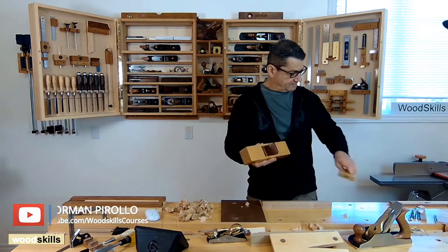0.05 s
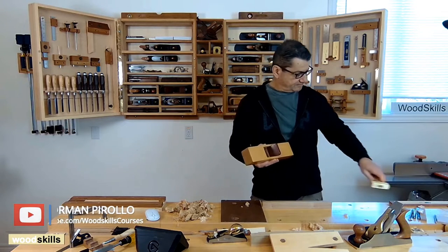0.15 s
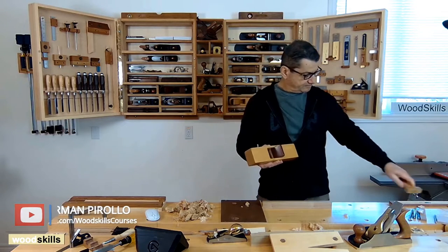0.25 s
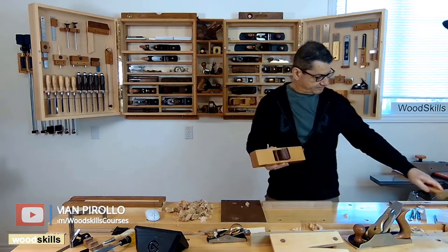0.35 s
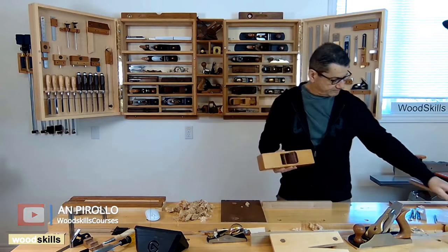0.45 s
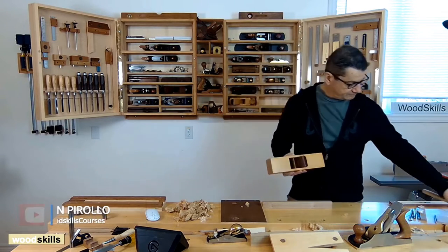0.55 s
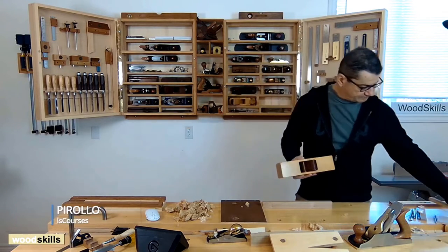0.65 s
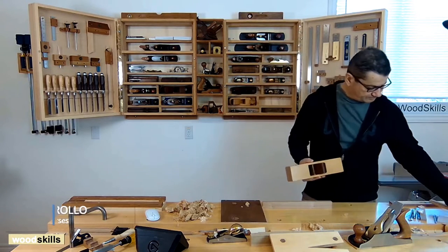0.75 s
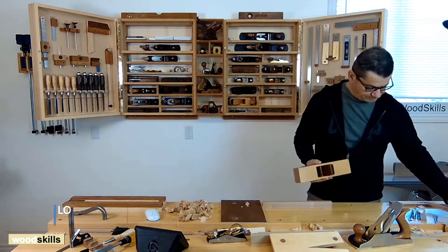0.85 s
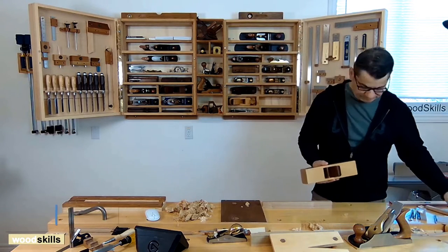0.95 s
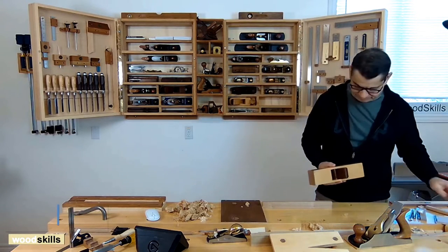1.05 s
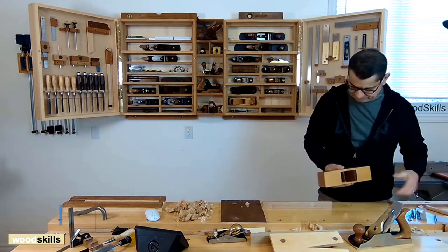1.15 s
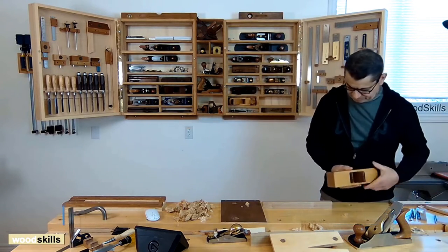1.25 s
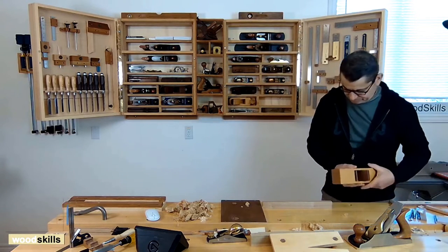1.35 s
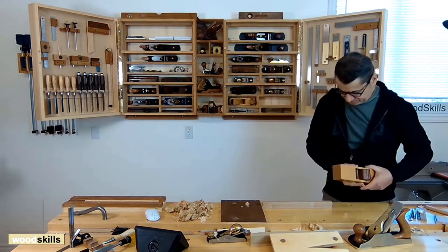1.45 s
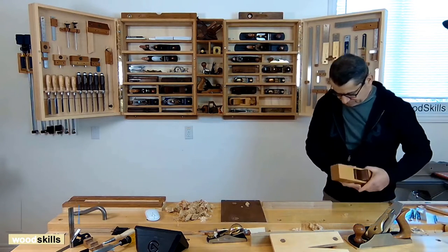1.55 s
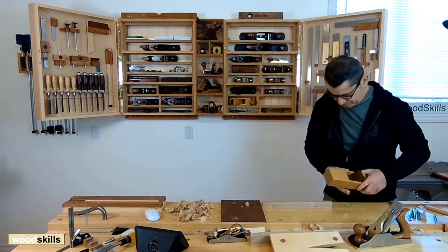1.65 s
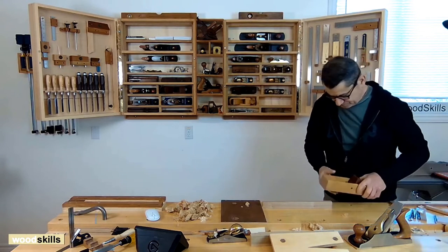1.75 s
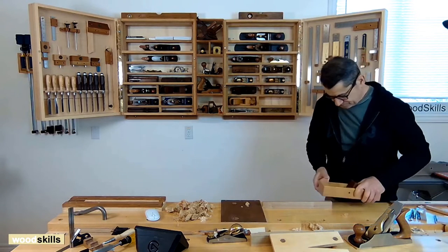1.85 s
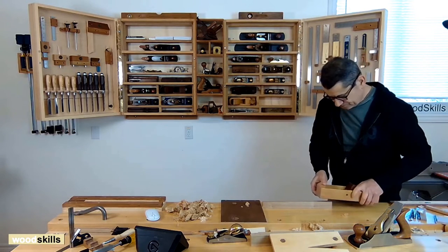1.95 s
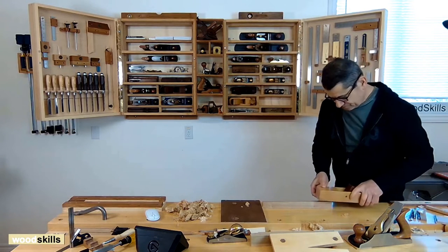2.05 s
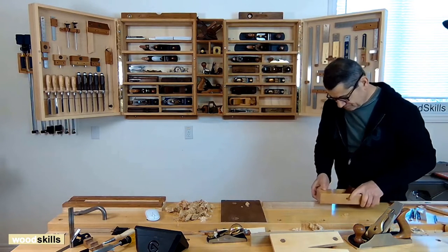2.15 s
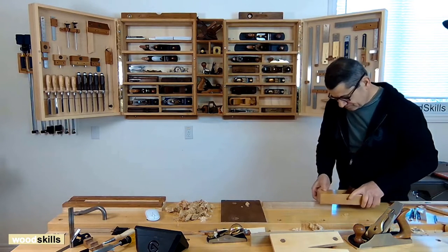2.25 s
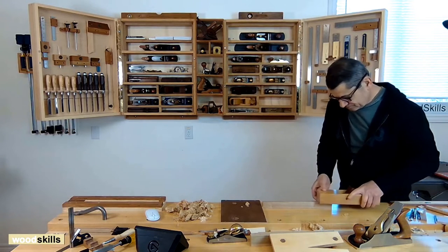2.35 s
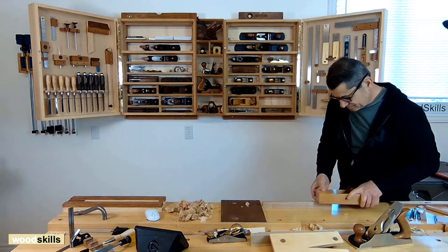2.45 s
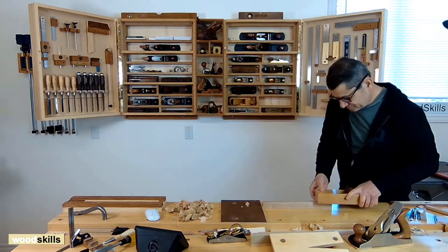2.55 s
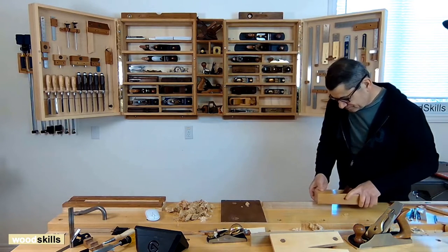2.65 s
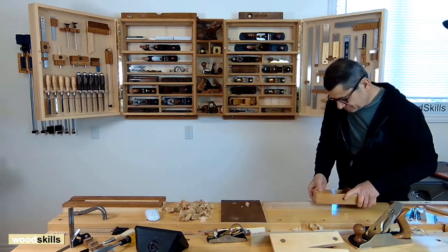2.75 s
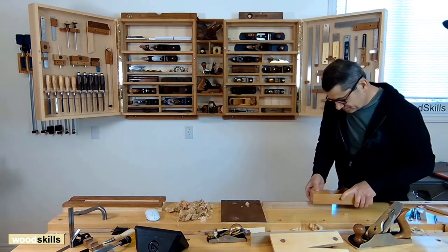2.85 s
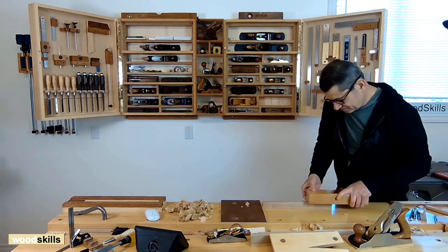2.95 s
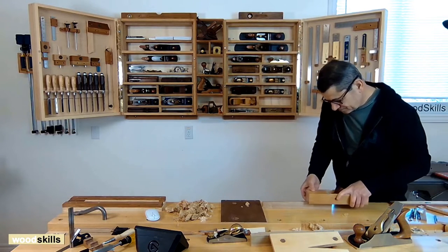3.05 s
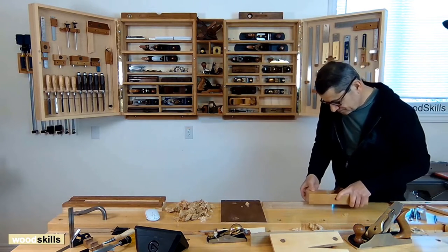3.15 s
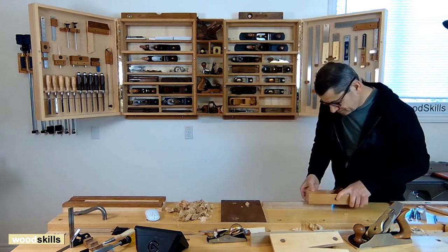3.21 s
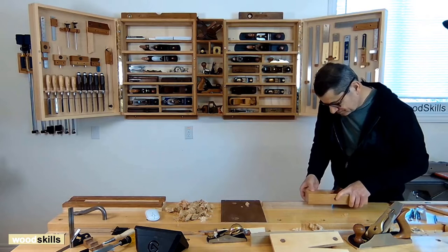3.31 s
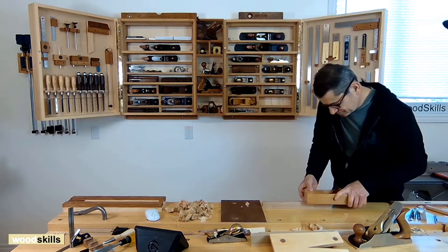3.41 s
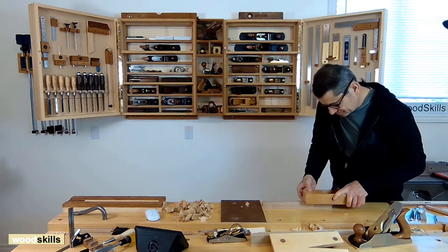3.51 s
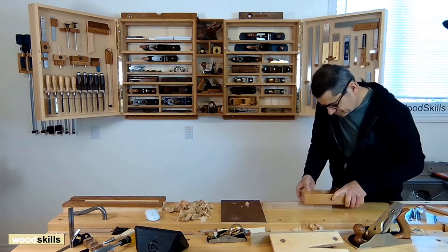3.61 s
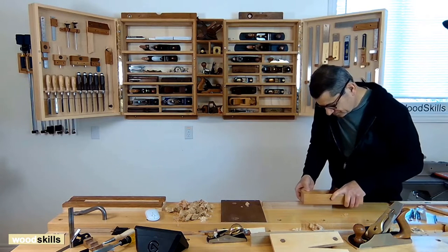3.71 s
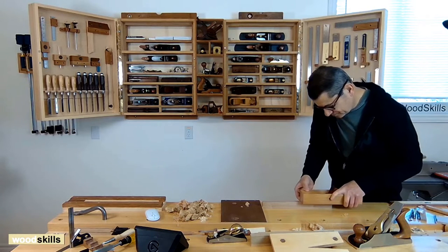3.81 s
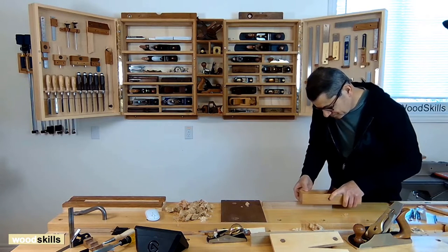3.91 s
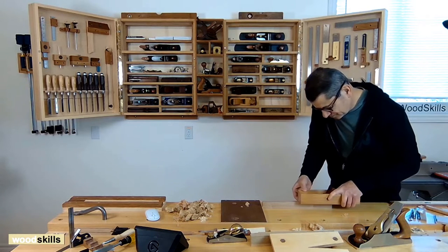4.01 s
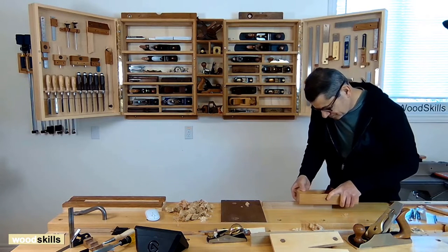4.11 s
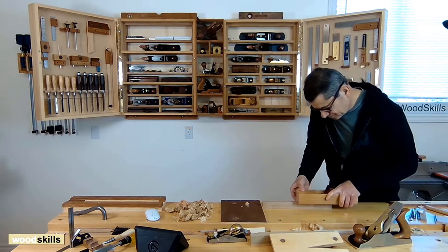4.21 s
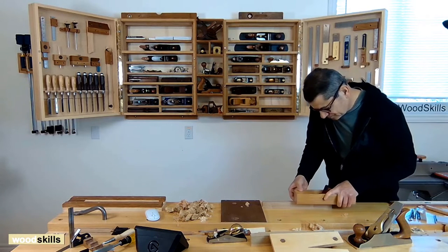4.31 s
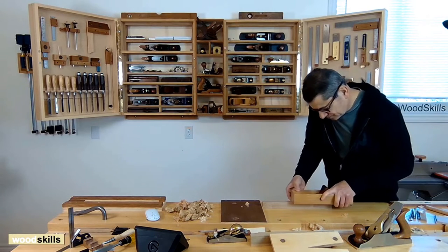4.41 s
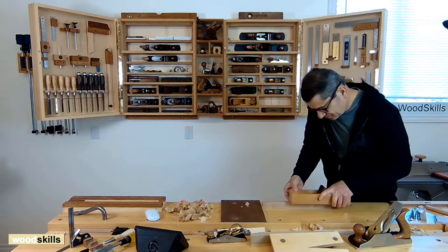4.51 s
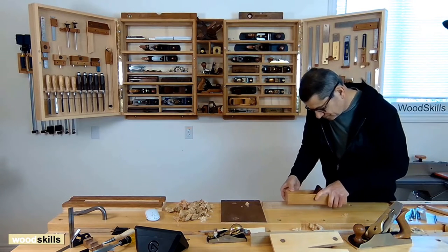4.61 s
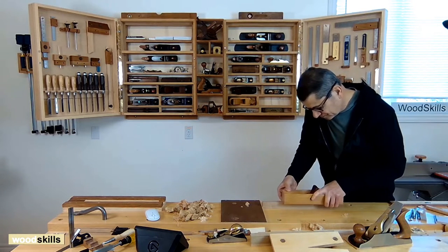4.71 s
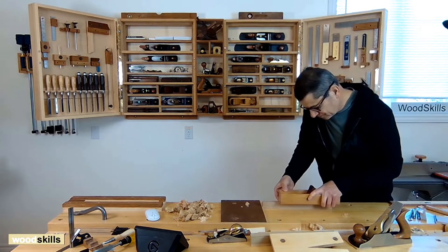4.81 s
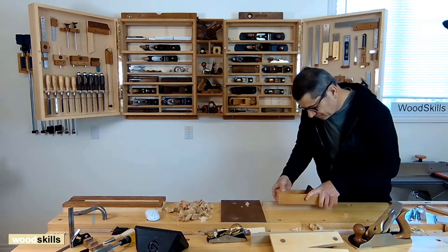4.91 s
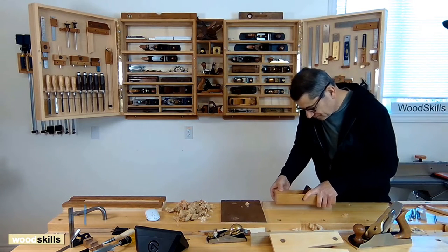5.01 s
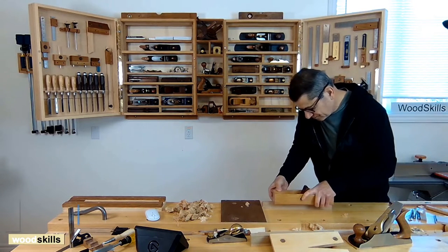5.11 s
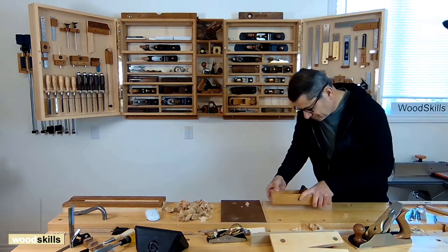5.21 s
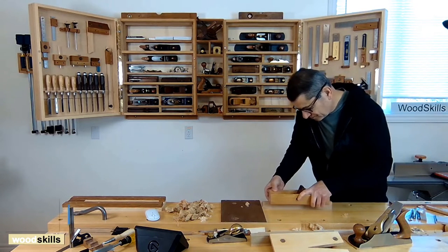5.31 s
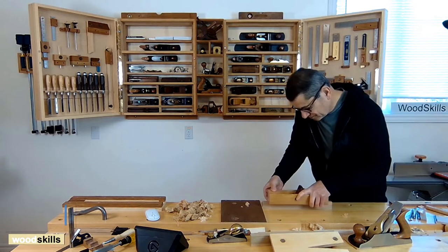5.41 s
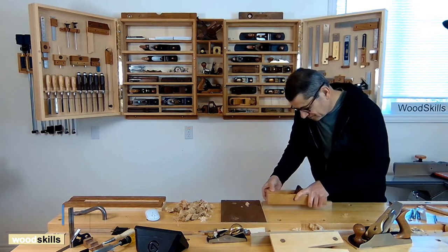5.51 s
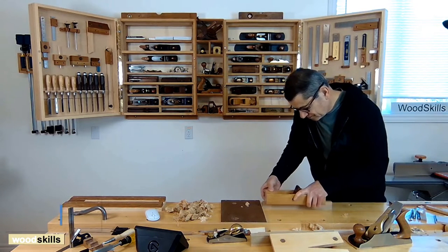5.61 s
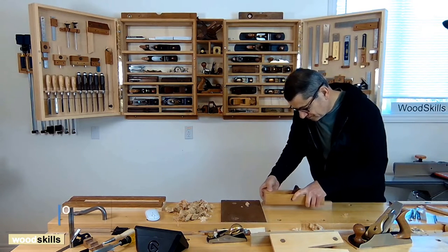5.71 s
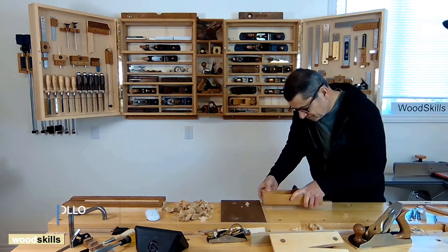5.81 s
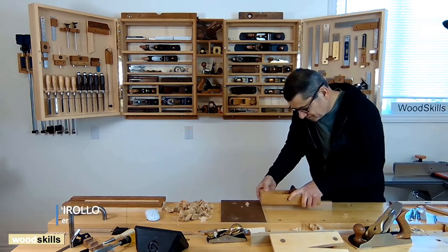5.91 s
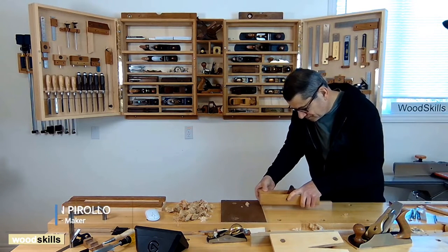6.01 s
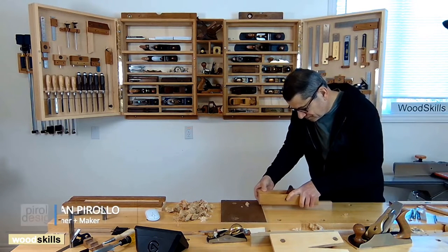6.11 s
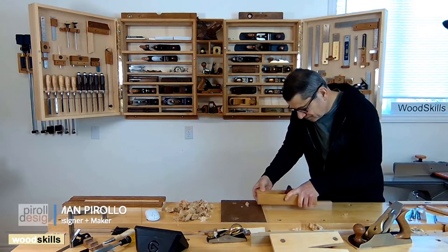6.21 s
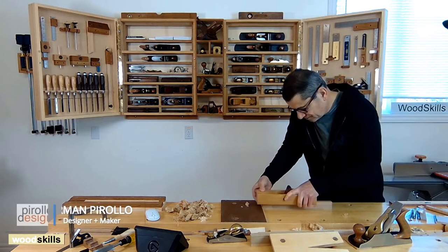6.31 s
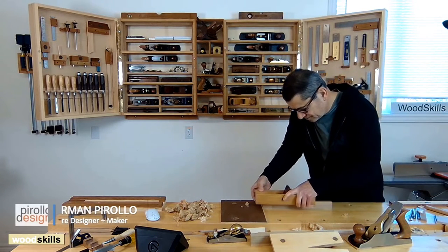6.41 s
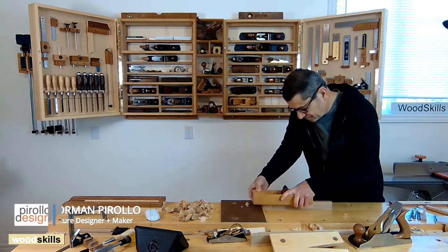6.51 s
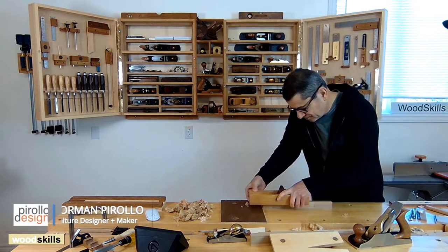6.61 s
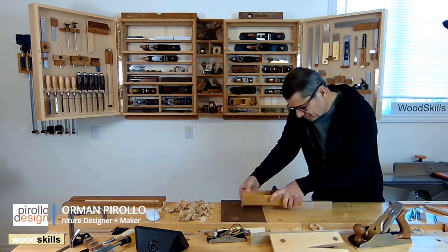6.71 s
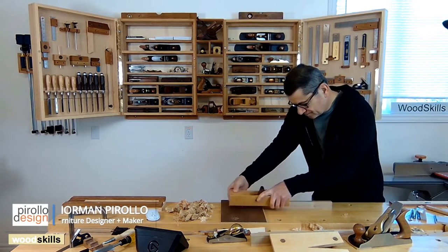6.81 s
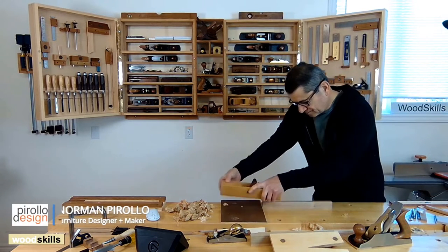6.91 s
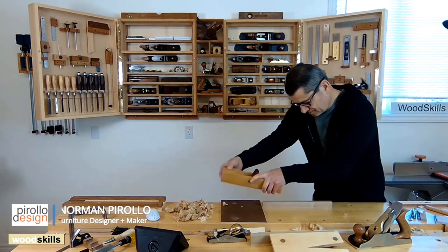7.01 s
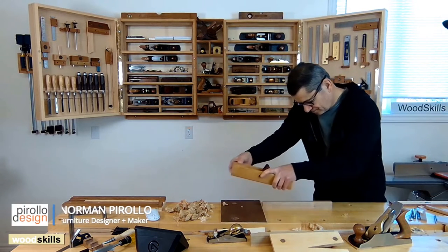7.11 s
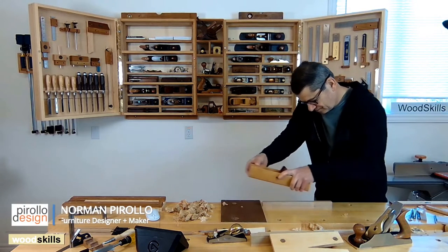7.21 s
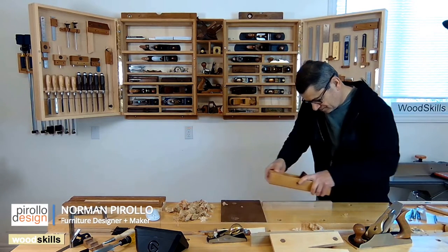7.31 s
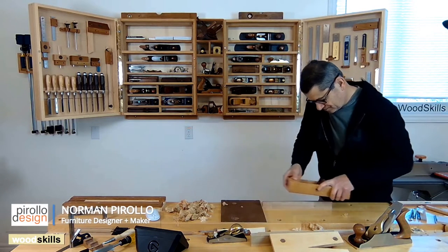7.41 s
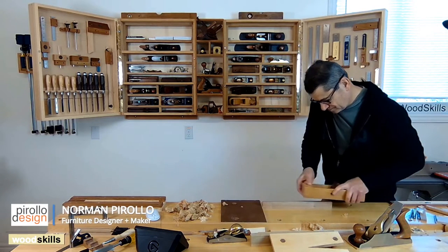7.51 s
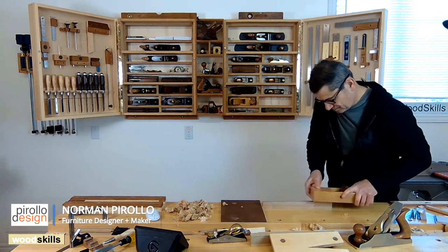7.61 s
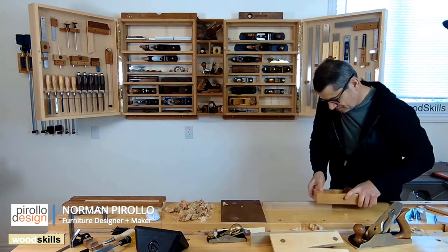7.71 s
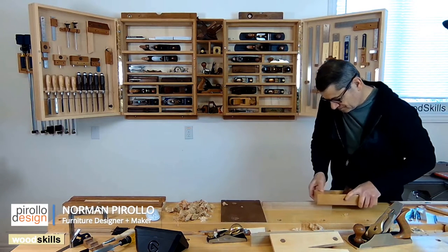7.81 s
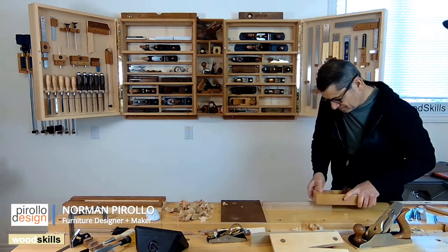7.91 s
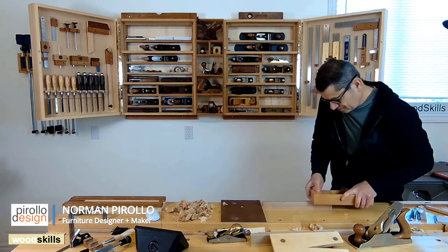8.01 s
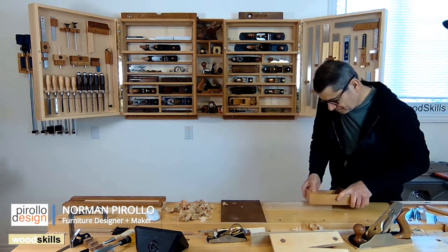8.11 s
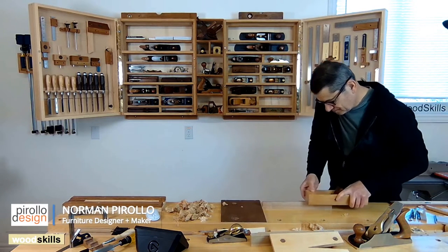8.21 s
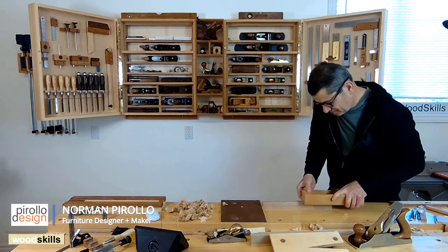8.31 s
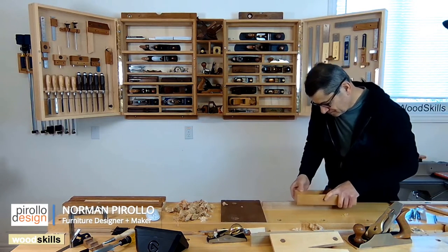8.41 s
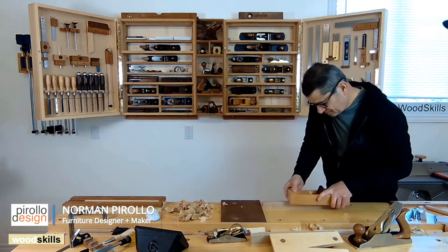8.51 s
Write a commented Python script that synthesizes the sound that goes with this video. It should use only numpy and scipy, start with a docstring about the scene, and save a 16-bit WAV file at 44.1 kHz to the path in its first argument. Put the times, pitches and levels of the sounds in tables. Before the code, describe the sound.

A few metres from the microphone in a live, quiet workshop, a faint metallic ping and two soft steps lead to dull wooden taps and a loud steel clank on a metal table. Clothing rustles, a wooden plane lands gently on a board, then one long uneven shaving stroke rumbles and hisses, ending in a stronger scrape. A sharp wooden knock follows, and another stroke begins.

```python
"""In a live workshop, heard a few metres off, a steel tool rings faintly and feet step on the floor.
Shoes shuffle and sleeves rustle (shaped noise); the tool goes down on a machine table, handle first, then
steel head (dying sines on dull thuds), and furniture sways. A wooden hand plane knocks on a board and takes
one long shaving (board texture read at the plane's speed, under a hiss of tearing fibres); then the plane
knocks down again and starts the next stroke. Still room air lies under it all."""
import sys
import numpy as np
from scipy import signal
from scipy.fft import rfft, irfft
from scipy.io import wavfile

SR = 44100
rng = np.random.default_rng(int(sys.argv[2]) if len(sys.argv) > 2 else 0)


def pcm_store(signal):
    """Save signal as 16-bit PCM."""
    levels = np.round(np.clip(np.atleast_2d(signal), -1, 1) * 32767)
    wavfile.write(sys.argv[1], SR, levels.astype(np.int16).T)


N = 377055
TIME = np.arange(N) / SR
GRID = 32768  # samples in every response
AGE = np.arange(GRID) / SR  # seconds since a response began
HZ = np.maximum(np.arange(GRID // 2 + 1) * SR / GRID, 1)

# Spectrum of the tool's wooden handle on the table. Each row: frequency in Hz, relative level in dB.
HANDLE_SPECTRUM = [(60, -13.5), (200, -8), (400, -11.5), (620, -3), (850, -2.5), (1200, -0.5),
                   (1450, -18.5), (2200, -22.5), (3200, -30.5), (12000, -58)]
# Spectrum of shoes on the floor. Each row: frequency in Hz, relative level in dB.
FOOT_SPECTRUM = [(50, -4), (130, 1.5), (220, -1.5), (320, -11.5), (700, -20), (1500, -28), (9000, -65.5)]


def from_db(db):
    """Turn dB into an amplitude factor."""
    return np.exp(np.asarray(db) * np.log(10) / 20)


def rms_one(x):
    """Scale a steady sound to an rms of 1."""
    return x / np.sqrt(np.mean(x ** 2) + 1e-20)


def unit_energy(x):
    """Scale a passing sound to an energy of 1."""
    return x / np.sqrt(np.sum(x ** 2) + 1e-20)


def at_hz(points, hz=HZ):
    """Read a spectrum between its points, along a logarithmic frequency axis."""
    points = np.array(points)
    return np.interp(np.log(hz), np.log(points[:, 0]), points[:, 1])


def lift(resonances):
    """The dB that resonances, each (Hz, width in Hz, peak dB), add at each frequency."""
    return sum(db / (1 + (2 * (HZ - hz) / width) ** 2) for hz, width, db in resonances)


def through(x, response):
    """Send a sound through a body or a room, keeping its length."""
    return signal.oaconvolve(x, response)[:len(x)]


def body(db):
    """Causal (minimum-phase) response of a body with this spectrum; energy 1."""
    cepstrum = irfft(np.log(from_db(db)))
    cepstrum[1:GRID // 2] *= 2
    cepstrum[GRID // 2 + 1:] = 0
    return unit_energy(irfft(np.exp(rfft(cepstrum))))


def noise(db):
    """Steady noise with this spectrum; rms 1."""
    white = rng.standard_normal(N + GRID - 1)
    return rms_one(signal.fftconvolve(white, body(db), "valid"))


def flutter(rate, depth_db):
    """A gain that wanders at random, heading for a new value this many times a second."""
    return from_db(depth_db * np.interp(TIME * rate, np.arange(N), rng.standard_normal(N)))


def ringing(modes):
    """Sum of dying sines, each (Hz, dB, t60 in s); each dB value is the energy of its mode."""
    total = 0
    for hz, db, t60 in modes:
        dying_sine = np.sin(2 * np.pi * hz * AGE) * from_db(-60 * AGE / t60)
        total = total + from_db(db) * unit_energy(dying_sine)
    return unit_energy(total)


def blow(sound, db):
    """A blow set to its level over a tenth of a second."""
    return from_db(db) * np.sqrt(SR / 10) * unit_energy(sound)


def soften(x, corner_hz):
    """A soft contact loses its treble."""
    r = np.exp(-2 * np.pi * corner_hz / SR)
    return signal.lfilter([1 - r], [1, -r], x + 1e-18)


def scatter(x, share=0.38):
    """Waves running to and fro in a solid spread a blow over a few milliseconds."""
    for lag in (7, 17, 29):  # samples; an allpass loop each
        loop = np.r_[1, np.zeros(lag - 1), share]
        x = signal.lfilter(loop[::-1], loop, x + 1e-18)
    return x


def add(out, s, sound):
    """Lay a sound into the take at s seconds."""
    start = max(round(s * SR), 0)
    out[start:start + len(sound)] += sound[:N - start]


def rub(moves, spectrum, rough_db, attack_s, release_s):
    """Something soft slides unevenly over a surface: each move swells, holds and dies away."""
    level = 0
    for s, length, db in moves:
        before = (s - TIME) / attack_s
        after = (TIME - s - length) / release_s
        level = level + from_db(db) * np.exp(-np.maximum(before, after).clip(0))
    return level * noise(at_hz(spectrum)) * flutter(50, depth_db=rough_db)


def workshop(x, wet_db, gap=0.0032):
    """Direct sound, then (after gap s) dense reflections, each band dying at its own pace.

    Every call draws a new pattern of reflections, as each place in the room has its own."""
    # Each row: frequency in Hz, t60 in s, strength of the reflections in dB on top of wet_db.
    room_bands = [(100, 0.17, 6), (304, 0.84, 2.5), (900, 0.78, 3.5), (2000, 0.78, 0.5), (4000, 0.66, -3),
                  (6960, 0.45, -4.5), (14000, 0.21, -5.5)]
    white, tail = rfft(rng.standard_normal(GRID)), 0
    for hz, t60, db in room_bands:
        band = at_hz([(row[0], row[0] == hz) for row in room_bands])
        tail = tail + irfft(white * band) * from_db(db - 60 * AGE / t60)
    middle_t60 = room_bands[2][1]
    middle_energy = np.sum(from_db(-60 * AGE / middle_t60) ** 2)
    response = tail * (AGE > gap) * from_db(wet_db) / np.sqrt(middle_energy)
    response[0] = 1  # the direct sound
    return through(x, response / np.hypot(1, from_db(wet_db)))


def nearby_echoes(x, share=.5, t60=0.13, size_hz=1500):
    """Tools and cabinets scatter the shorter waves back as quick echoes that comb a steady sound."""
    echoes = unit_energy(rng.standard_normal(GRID) * from_db(-60 * AGE / t60))
    short_waves = echoes - soften(echoes, size_hz)
    return (x + share * through(x, short_waves)) / np.hypot(1, share)


def still_air(level_db=-56):
    """The still room: steady noise, mostly deep."""
    # Each row: frequency in Hz, relative level in dB.
    air_spectrum = [(10, -15), (22, 4), (35, 0), (60, -7.5), (110, -25), (300, -20), (600, -24.5),
                    (1400, -26), (2200, -31), (4000, -38.5), (15000, -46)]
    return from_db(level_db) * noise(at_hz(air_spectrum))


def ping(s=0.0045, db=-50):
    """A light nudge leaves the steel tool ringing faintly on the table."""
    # Each row: frequency in Hz, relative energy in dB, t60 in s.
    ping_modes = [(1200, -0.5, 0.23), (1356, -5, 0.13), (1650, -7.5, 0.13)]
    out = np.zeros(N)
    nudge = ringing(ping_modes) + .5 * body(at_hz(HANDLE_SPECTRUM))
    add(out, s, workshop(blow(nudge, db), wet_db=12))
    return out


def steps(wet_db=6.5, shoe_hz=450):
    """Soft shoes come down on the floor, their treble lost in the sole."""
    # Each row: start in seconds, level in dB.
    footfalls = [(.282, -50.5), (.578, -43)]
    out, thump = np.zeros(N), soften(body(at_hz(FOOT_SPECTRUM)), shoe_hz)
    for s, db in footfalls:
        add(out, s, workshop(blow(thump, db), wet_db))
    return out


def shuffling():
    """Soles and palms rub over a surface: uneven noise with the spectrum of the feet."""
    # Each row: start in seconds, length in seconds, level in dB.
    shuffle_moves = [(.37, .06, -59), (1.48, 0.19, -53), (2.95, 0.36, -62), (3.62, 0.079, -53),
                     (4.05, 0.24, -51), (6.47, 0.043, -52), (7.58, .09, -61.5)]
    return rub(shuffle_moves, FOOT_SPECTRUM, rough_db=3.5, attack_s=0.076, release_s=.09)


def sleeves(gain_db=8.0):
    """Cloth brushes on cloth as the arms move."""
    # Each row: start in seconds, length in seconds, level in dB ahead of gain_db.
    arm_moves = [(.38, 0.08, -64), (.62, 0.81, -64), (1.82, 0.12, -57.5), (2.93, 0.075, -66.5),
                 (7.42, 0.31, -78)]
    # Each row: frequency in Hz, relative level in dB.
    cloth_spectrum = [(200, -8), (500, -6), (900, -5), (1500, -1), (2200, -7), (3000, -7), (5500, -10),
                      (9000, -19.5), (15000, -35)]
    return from_db(gain_db) * rub(arm_moves, cloth_spectrum, rough_db=2.5, attack_s=.07, release_s=0.063)


def handle_taps(ring_db=-3.5, wet_db=7.5, t60=0.027):
    """The wooden handle lands first and rocks: dull taps, each bringing out one resonance where it lands."""
    # Each row: start in seconds, level in dB, ringing frequency in Hz.
    taps = [(.722, -37.5, 1136), (.738, -38, 780), (.756, -38.5, 1170), (.774, -37, 810), (.80, -42, 1200),
            (.83, -44, 850), (.877, -37, 2656), (.897, -40.5, 800), (.934, -40, 1081)]
    out, thud = np.zeros(N), scatter(body(at_hz(HANDLE_SPECTRUM)))
    for s, db, hz in taps:
        tap = thud + from_db(ring_db) * ringing([(hz, 0, t60)])
        add(out, s, workshop(blow(tap, db), wet_db))
    return out


def sway():
    """Heavy furniture rocks slowly after a blow: deep dying sines, each kept for two seconds."""
    # Each row: start in seconds, height in dB, frequency in Hz, t60 in s.
    sways = [(.775, -32.5, 30.24, 1.9), (0.966, -26, 30.54, 2.3), (2.271, -45, 30.8, 2.7),
             (8.195, -39, 28.6, 3.2)]
    out, age = np.zeros(N), TIME[:2 * SR]
    for s, db, hz, t60 in sways:
        add(out, s, from_db(db - 60 * age / t60) * np.sin(2 * np.pi * hz * age))
    return out


def steel_clank(ring_db=-8.5, wet_db=3.0):
    """The steel head drops on the machine table with a double crack, and both ring."""
    # Each row: start in seconds, level in dB.
    cracks = [(.9650, -20.5), (0.9676, -16.5)]
    # Each row: frequency in Hz, relative level in dB.
    steel_spectrum = [(60, -24.5), (200, -10), (420, -15), (620, -7), (1200, -1.5), (2700, 0.5), (3700, -4),
                      (4500, 2), (5000, -6.5), (6900, -3), (7700, -20), (10500, -23), (15500, -26)]
    # Each row: frequency in Hz, relative energy in dB, t60 in s.
    steel_modes = [(600, -9.5, 0.64), (838, -3, .45), (1142, -8.5, 0.63), (1300, -6.5, .5),
                   (1570, -8.5, 0.51), (1776, -4.5, 0.24), (2675, -4, 0.26), (2833, -4.5, 0.35),
                   (4470, -1, 0.35), (4510, 0, .12), (6810, -5.5, .25), (9350, -10, 0.14)]
    out = np.zeros(N)
    clank = scatter(body(at_hz(steel_spectrum)), share=0.66) + from_db(ring_db) * ringing(steel_modes)
    for s, db in cracks:
        add(out, s, workshop(blow(clank, db), wet_db))
    return out


def iron_spectrum():
    """The hiss of the shaving, lifted at the resonances of the iron; in dB."""
    # Each row: frequency in Hz, relative level in dB.
    shaving_spectrum = [(1800, -10.5), (3500, -1.5), (4500, -4), (5600, -1), (6900, -4.5), (8400, -6),
                        (9100, -13), (10500, -14.5), (12000, -18.5), (15500, -21)]
    # Each row: frequency in Hz, width in Hz, lift in dB.
    iron_resonances = [(7460, 50, 3), (7710, 83, 11.5), (9830, 154, 7)]
    return at_hz(shaving_spectrum) + lift(iron_resonances)


def plane_knocks(ring_db=-5.5, wet_db=4.5, flesh_ratio=6):
    """The wooden body thuds on the board while the iron ticks in its bed; hands cushion a gentle landing."""
    # Each row: start in seconds, level in dB, contact corner in Hz, tick of the iron in dB.
    knocks = [(1.944, -57, 250, -85.5), (2.264, -50, 502, -90), (2.271, -43, 598, -90),
              (3.023, -45.5, 329, -60.5), (3.028, -44, 330, -65), (6.835, -43.5, 401, -45.5),
              (7.8484, -26, 12000, -60), (8.193, -39, 501, -52.5)]
    # Plane and bench together. Each row: frequency in Hz, relative level in dB.
    bench_spectrum = [(60, -13), (125, -2.5), (200, -0.5), (300, -13.5), (430, -6), (600, -7), (900, -4),
                      (1400, -1.5), (1650, -5.5), (2000, -4), (2400, -9), (2700, -10), (3700, -8.5),
                      (4300, -21), (5600, -18), (12000, -56)]
    # Their modes. Each row: frequency in Hz, relative energy in dB, t60 in s.
    wood_modes = [(124, -3.5, 0.24), (680, -10.5, 0.37), (853, -6.5, 0.5), (989, -13, .32),
                  (1307, 4, 0.055), (1926, -3.5, 0.38), (3090, -7, .4), (5394, -14, 0.3), (7250, -19, .3)]
    out = np.zeros(N)
    wood = scatter(body(at_hz(bench_spectrum)), share=0.3) + from_db(ring_db) * ringing(wood_modes)
    tick = scatter(scatter(body(iron_spectrum())))
    for s, db, corner_hz, tick_db in knocks:
        thud = soften(soften(wood, corner_hz), flesh_ratio * corner_hz)
        # the tick goes through the room twice, which blurs it
        echoing_tick = workshop(blow(tick, tick_db), wet_db)
        add(out, s, workshop(blow(thud, db) + echoing_tick, wet_db))
    return out


def swell(strokes, fade=0.006):
    """Gain that follows the strokes, fading out (time constant in s) beyond their ends."""
    out = 0
    for s, db in map(np.transpose, strokes):
        outside = np.clip(np.maximum(s[0] - TIME, TIME - s[-1]), 0, 1)
        out = out + from_db(np.interp(TIME, s, db)) * np.exp(-outside / fade)
    return out


def texture(spectrum, speed):
    """Random roughness of the wood, read faster or slower."""
    return np.interp(np.cumsum(speed) % N, np.arange(N), noise(at_hz(spectrum)))


def planing(sole_db=-45.0, edge_db=-52.0, hiss_db=-61.0):
    """The plane reads the texture of the board, so its pitch follows the speed; tearing fibres hiss.

    All grows with the cut, until a deep cut puts the load on the iron and the sole falls quiet."""
    # How hard the iron cuts, in the long stroke and as the next begins. Each row: time in seconds, dB.
    long_stroke = [(3.35, -78), (3.4, -59.5), (3.73, -56), (3.83, -64), (4.12, -53), (4.3, -62),
                   (4.4, -46.5), (4.61, -50), (4.68, -45), (4.95, -48.5), (5.08, -54), (5.34, -52),
                   (5.38, -55), (5.72, -58), (5.99, -52), (6.16, -61.5), (6.23, -50.5), (6.39, -61),
                   (6.55, -45.5), (6.58, -50), (6.74, -35.5), (6.88, -43)]
    next_stroke = [(8.31, -53.5), (8.332, -52), (8.406, -37), (8.55, -36.5)]
    # The plane gathers speed, slows at arm's length and starts afresh.
    # Each row: time in seconds, share of full speed.
    speed_points = [(3.3, 0.91), (4.25, 0.98), (4.45, 1.01), (4.9, 1.002), (5.9, .96), (6.3, 0.82),
                    (6.9, .74), (8.3, 0.94)]
    # Board under the sole, then at the edge. Each row: frequency in Hz at reading speed 1, relative dB.
    sole_spectrum = [(70, -11), (130, -10.5), (220, -5.5), (330, -2.5), (470, 2.5), (660, -2), (850, -11),
                     (1150, -19.5), (2500, -37)]
    edge_spectrum = [(500, -14.5), (850, -10), (1150, -1.5), (1500, 0), (2150, 0.5), (2700, 4),
                     (2950, -3.5), (3300, -11), (4500, -18.5), (8000, -66)]
    # The board on the bench. Each row: frequency in Hz, width in Hz, lift in dB.
    board_resonances = [(199, 23, 6.5), (780, 91, 3.5), (882, 105, 4.5)]
    usual_cut_db, deep_cut_db = -53, -44.0
    tears_per_s = 9000

    cut = swell((long_stroke, next_stroke), fade=0.0249) / from_db(usual_cut_db)
    on_sole = 1 / (1 + (cut / from_db(deep_cut_db - usual_cut_db)) ** 2.54)
    speed = np.interp(TIME, *np.transpose(speed_points))
    pressure = np.clip(cut, .5, 2) ** .22  # a deeper cut brightens the rumble

    sliding = cut ** 0.84 * speed ** 1.75 * on_sole
    sole = from_db(sole_db) * sliding * texture(sole_spectrum, speed * pressure) * flutter(33, depth_db=2.5)
    edge = from_db(edge_db) * cut * texture(edge_spectrum, speed) * flutter(60, depth_db=1.2)

    torn = rng.random(N) < tears_per_s / SR
    tears = torn * rng.standard_normal(N) * flutter(400, depth_db=0.5)
    hiss = from_db(hiss_db) * cut ** 0.87 * rms_one(through(tears, body(iron_spectrum())))
    return through(sole + edge, body(lift(board_resonances))) + hiss


def scene():
    """Blows, each from its own place in the room, and rubbing sounds from one place, over the still air."""
    blows = ping() + steps() + handle_taps() + steel_clank() + plane_knocks()
    rubbing = workshop(nearby_echoes(shuffling() + sleeves() + planing()), wet_db=-6.5)
    return (still_air() + blows + sway() + rubbing)[None]


def record(dry):
    """At the microphone the loudest peaks are rounded and the top is cut."""
    top, cutoff_hz = 1.1, 15700
    rounded = top * np.tanh(dry / top)
    low_pass = signal.ellip(12, .1, 80, cutoff_hz, fs=SR, output="sos")
    return signal.sosfilt(low_pass, rounded)


dry = scene()
out = record(dry)
pcm_store(out)
```